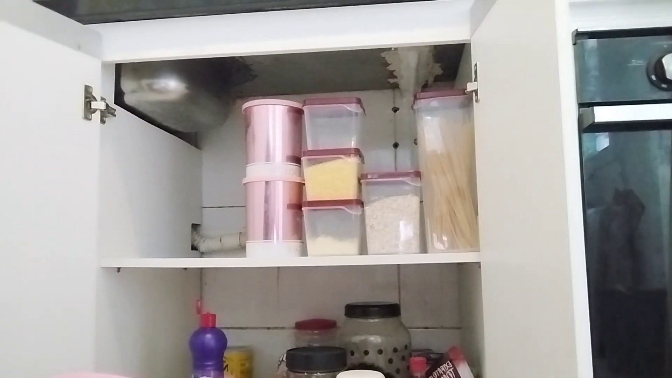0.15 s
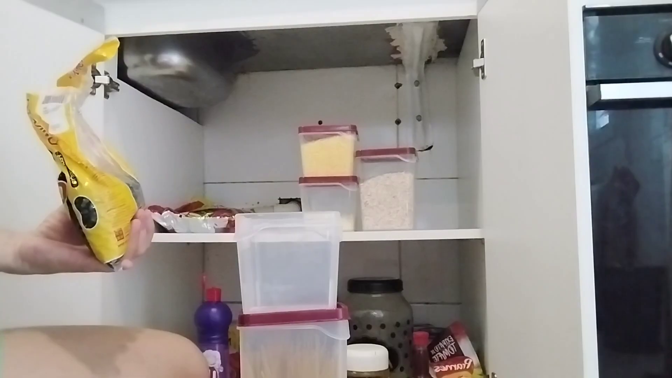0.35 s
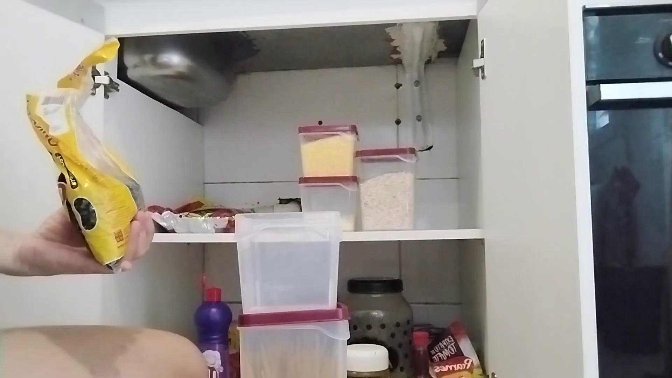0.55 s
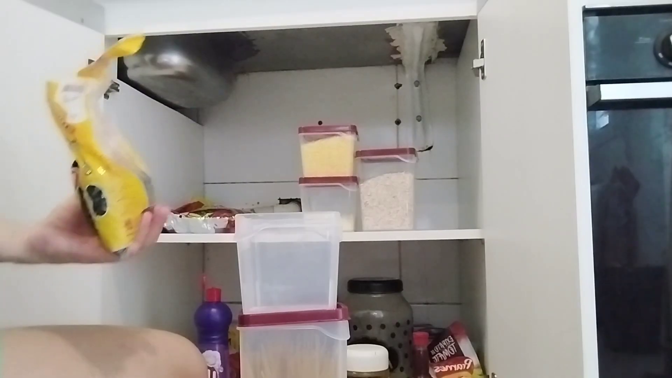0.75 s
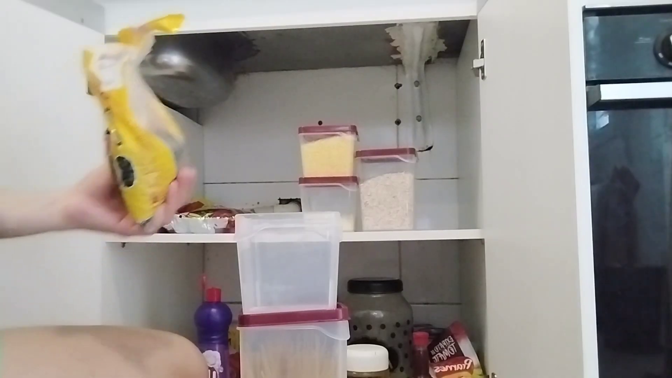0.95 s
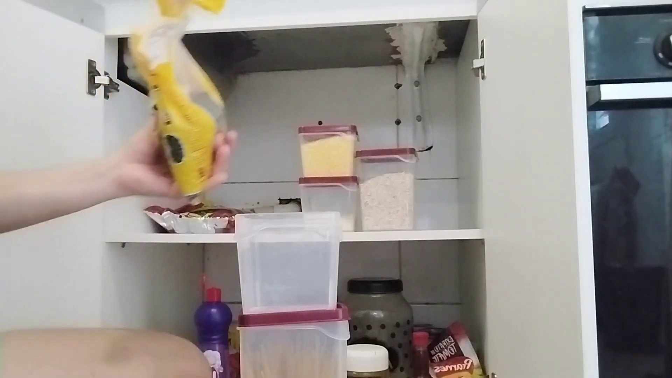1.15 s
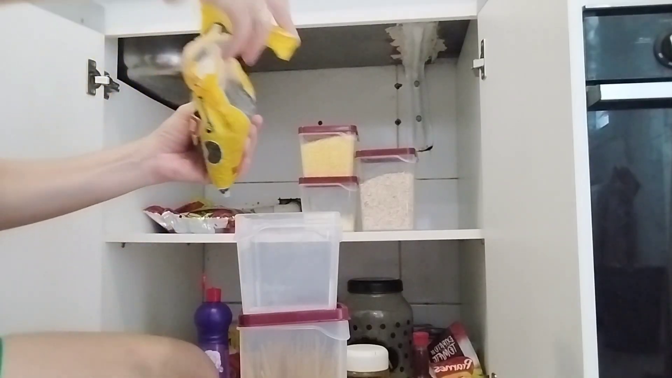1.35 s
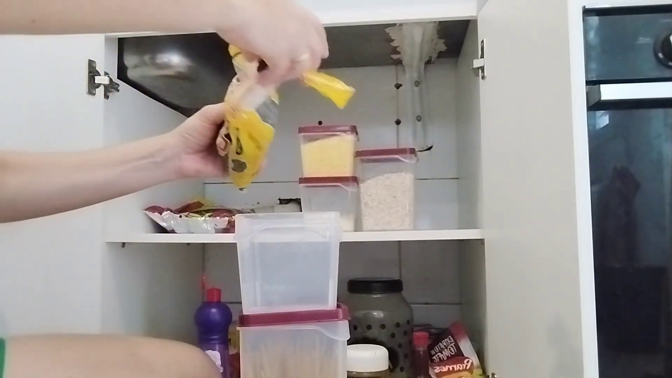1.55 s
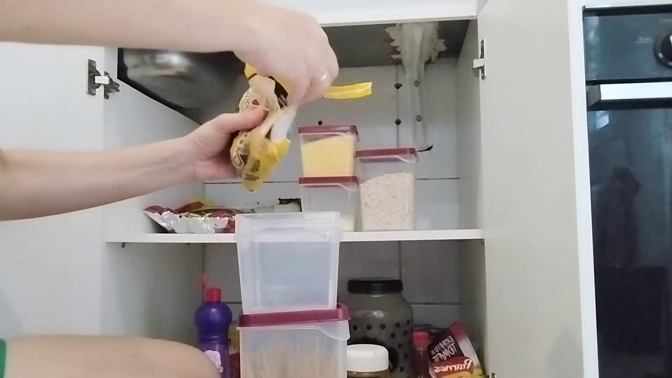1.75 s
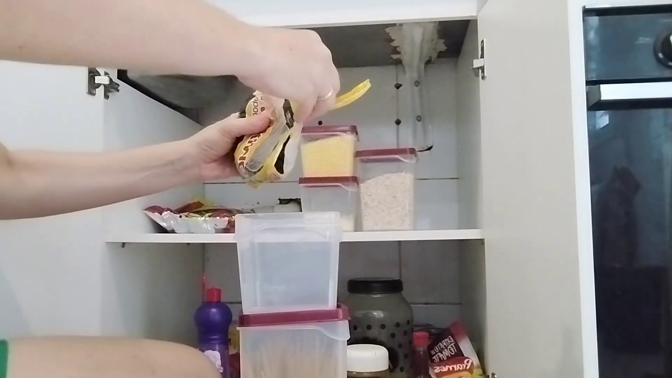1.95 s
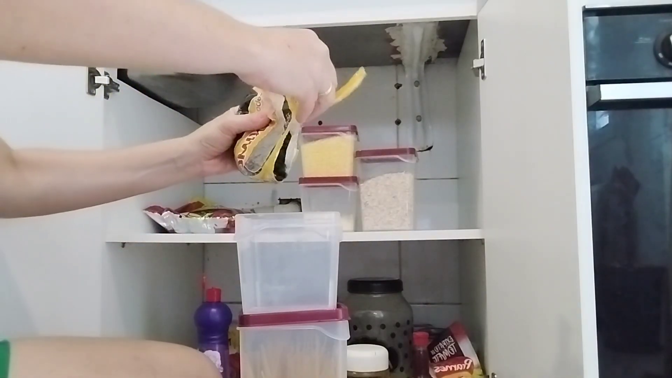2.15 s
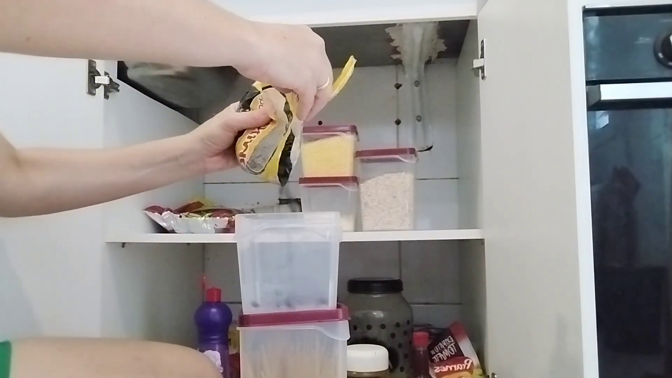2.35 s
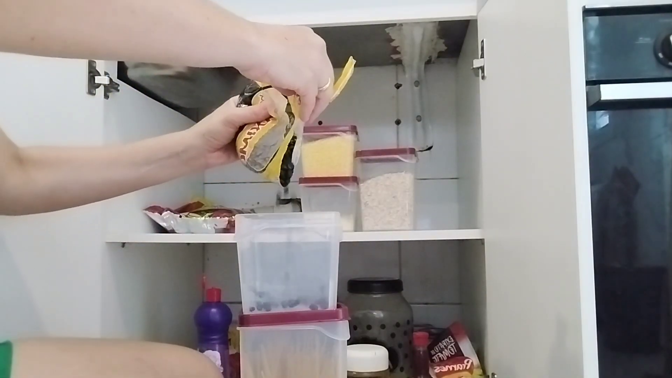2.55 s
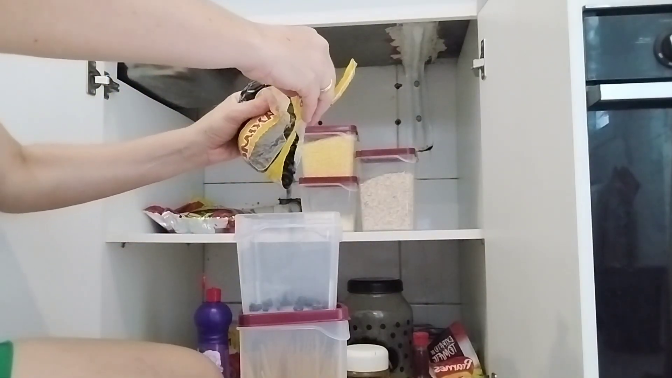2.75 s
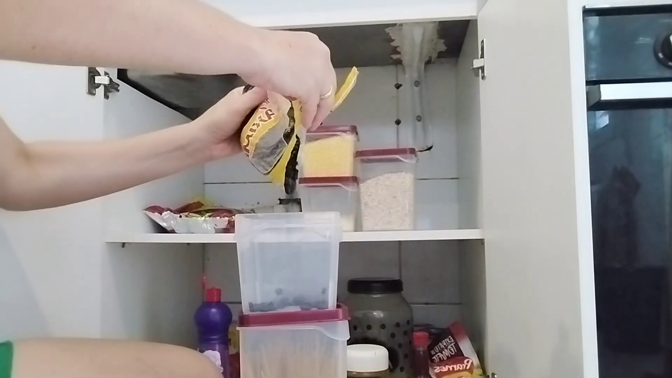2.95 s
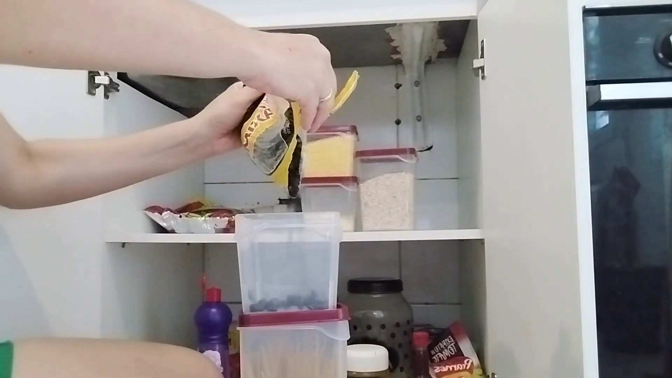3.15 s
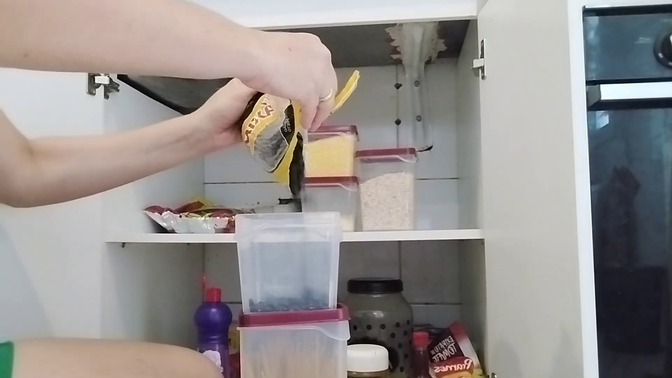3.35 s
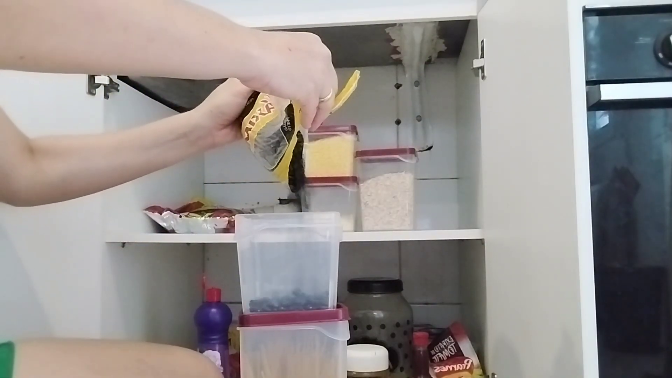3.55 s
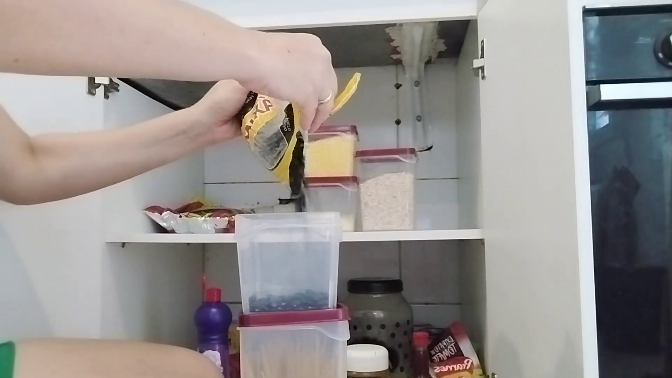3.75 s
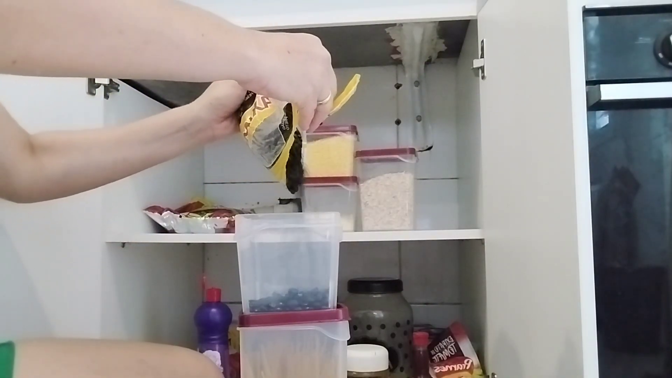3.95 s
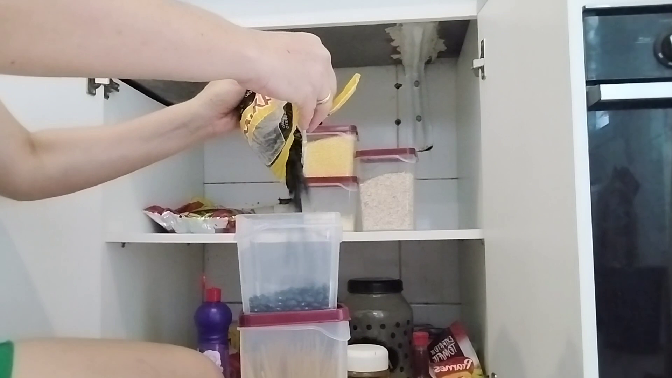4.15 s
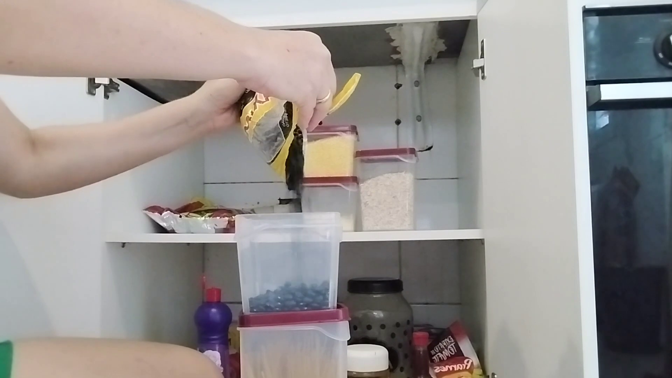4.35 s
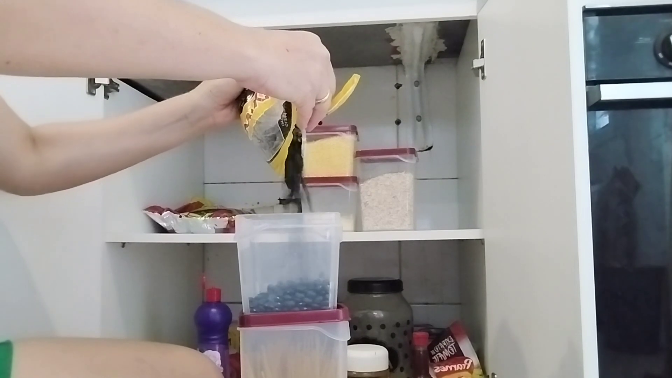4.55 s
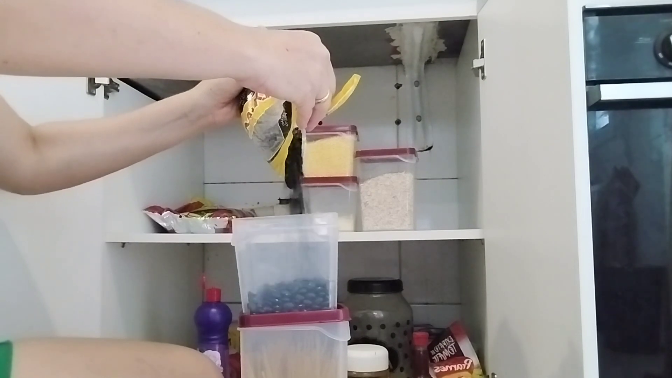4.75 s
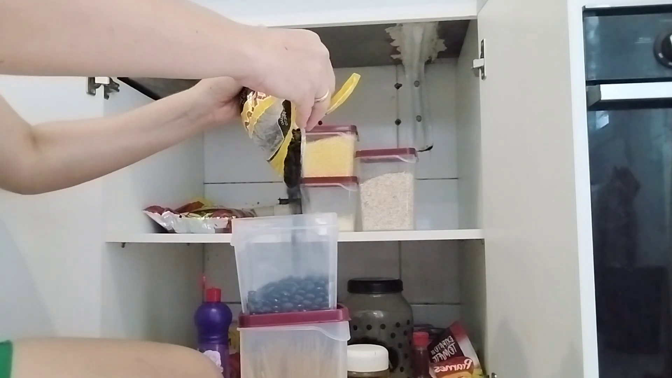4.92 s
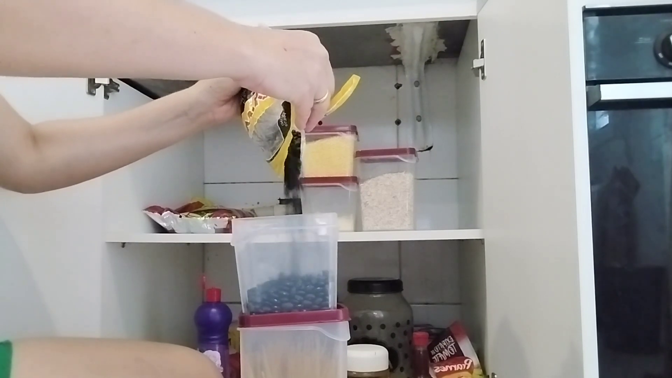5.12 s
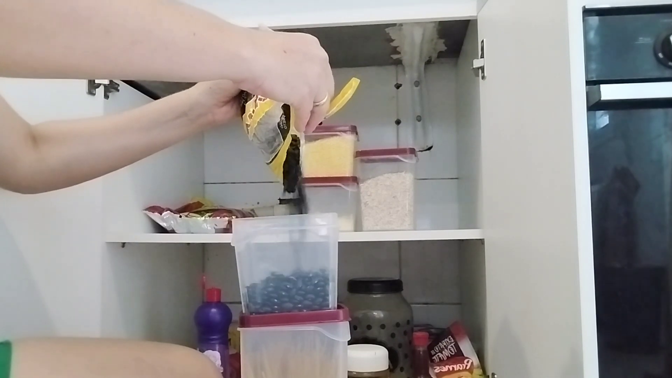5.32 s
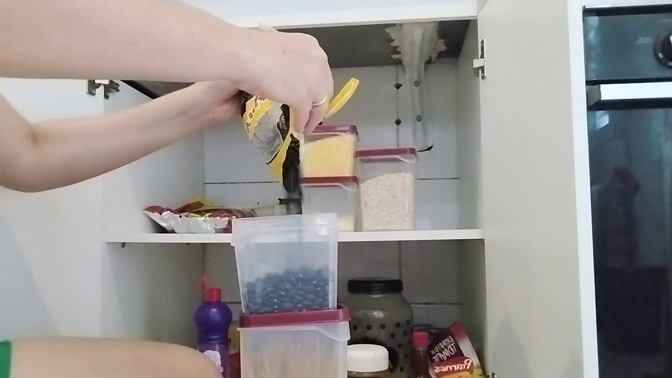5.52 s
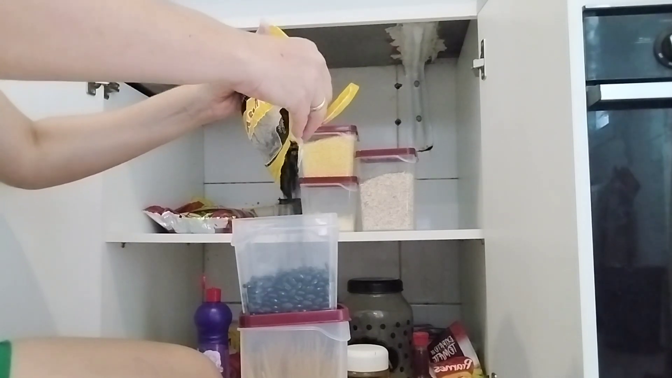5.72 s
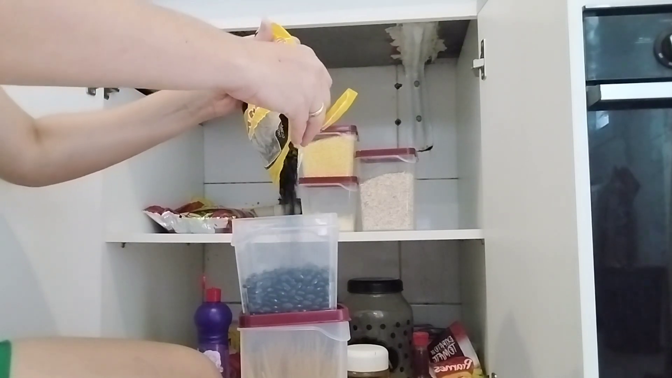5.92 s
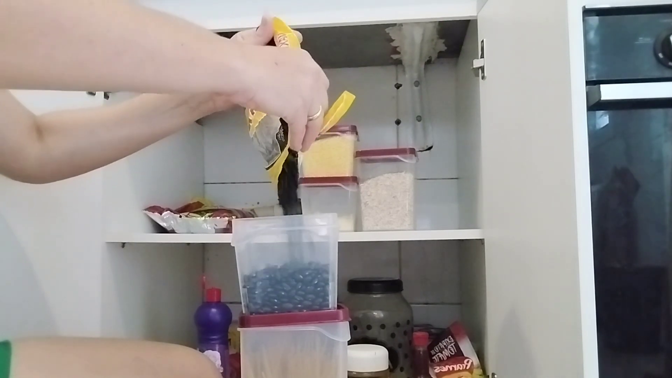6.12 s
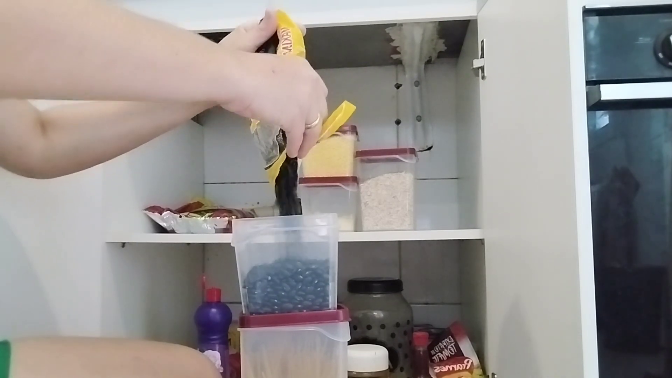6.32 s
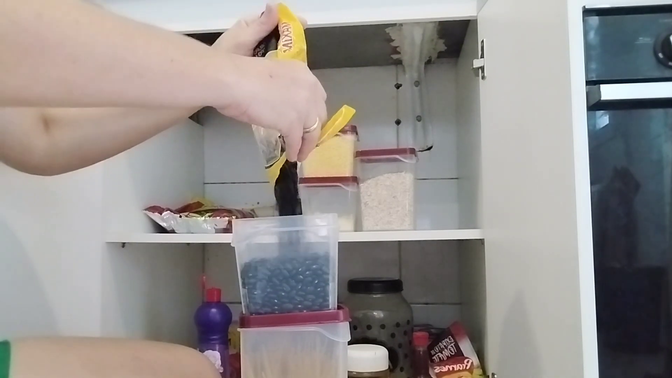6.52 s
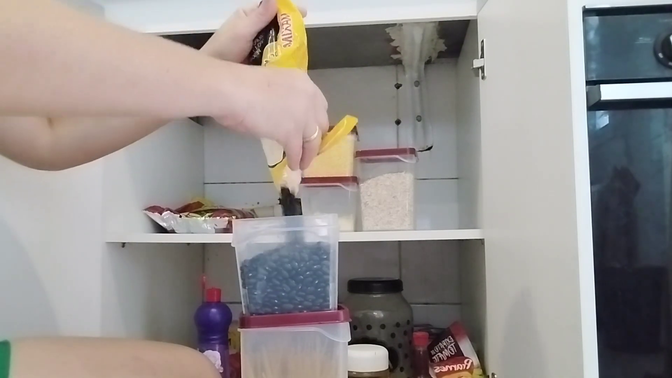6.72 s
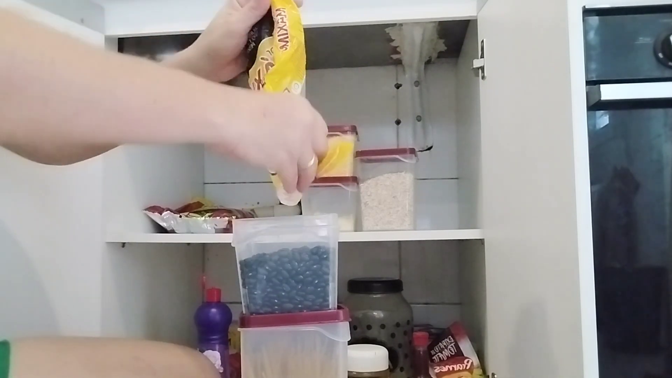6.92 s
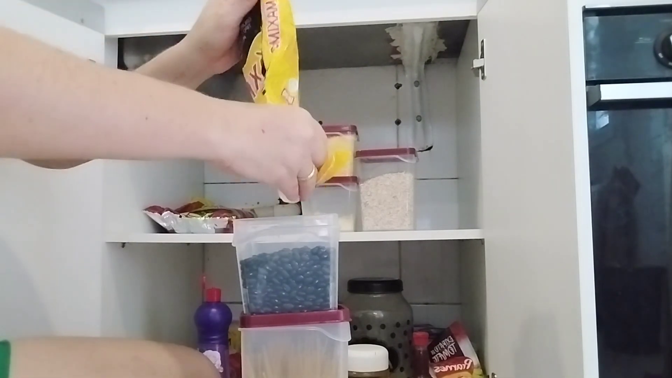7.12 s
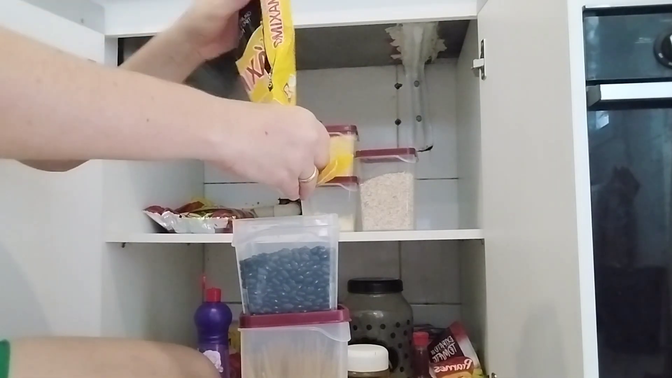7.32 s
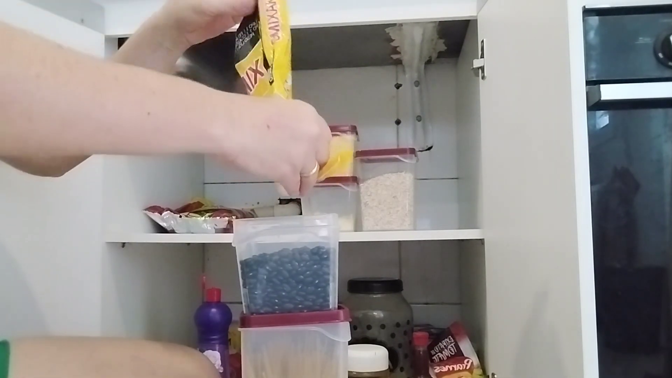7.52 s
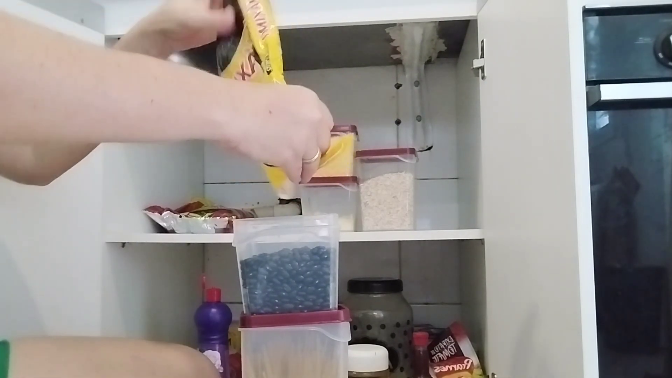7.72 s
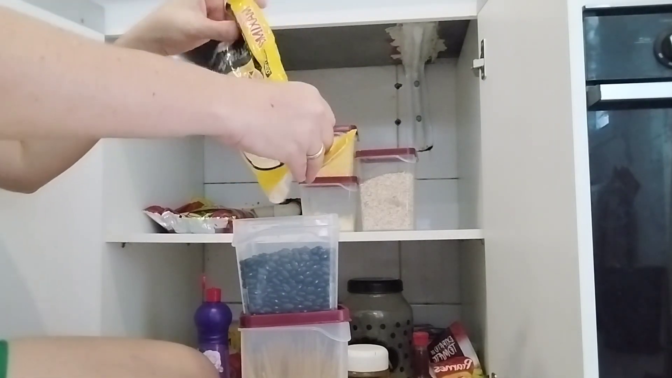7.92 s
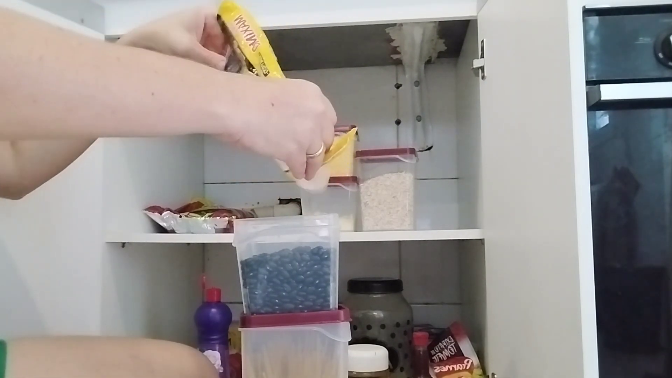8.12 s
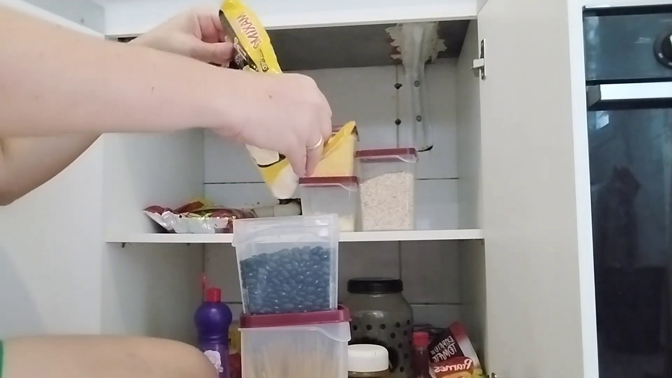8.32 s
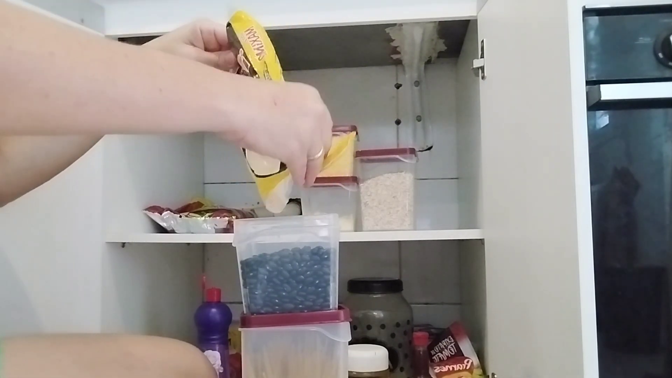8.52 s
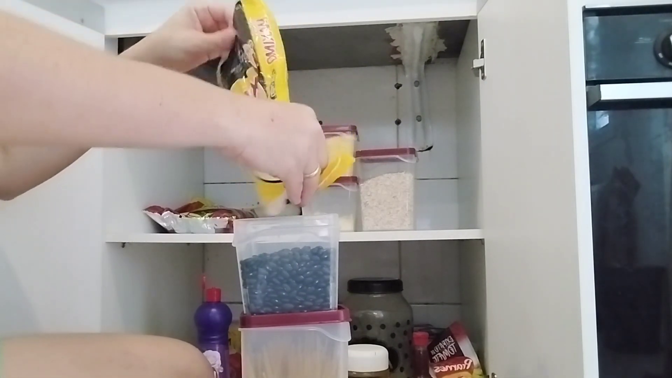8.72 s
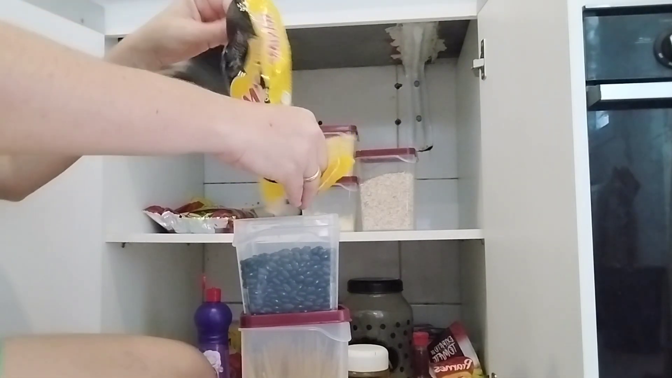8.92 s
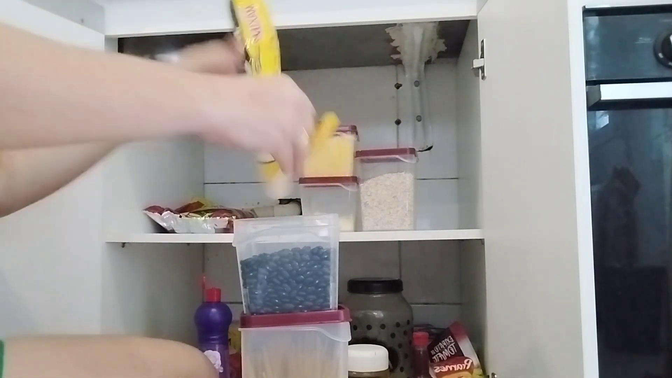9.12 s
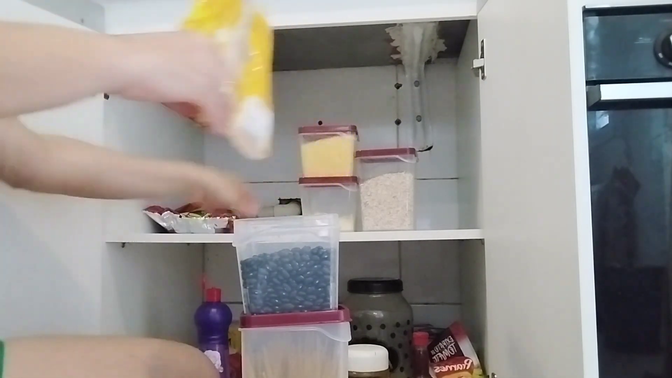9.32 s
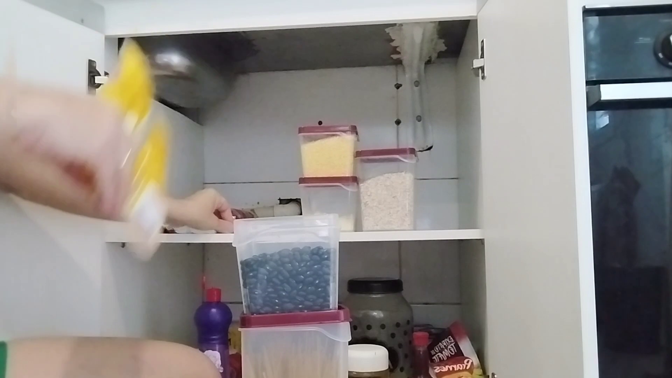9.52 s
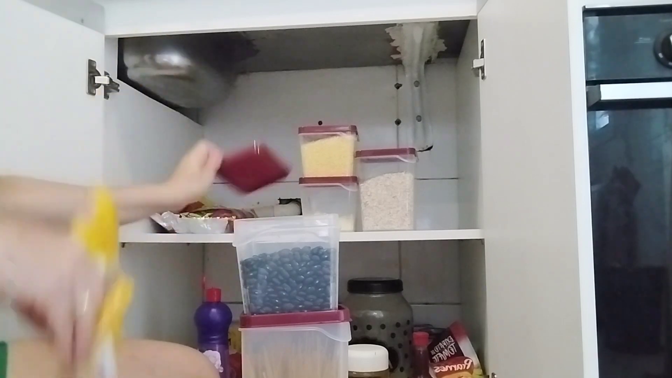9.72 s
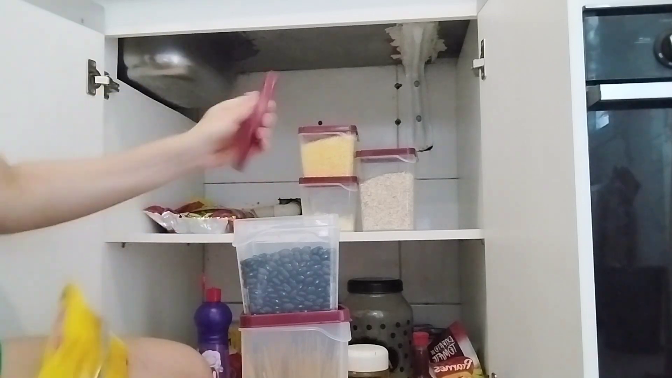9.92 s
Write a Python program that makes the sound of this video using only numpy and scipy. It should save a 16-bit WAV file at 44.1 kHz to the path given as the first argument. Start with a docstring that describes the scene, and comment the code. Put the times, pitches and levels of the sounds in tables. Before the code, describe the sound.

Dry beans pour from a crackling plastic packet into a plastic tub, rattling hollow at first, then duller as it fills.

```python
"""In a tiled room, in front of an open kitchen cupboard, dry beans pour from a plastic packet into a plastic tub.
Random and timed impacts ring the modes of the tub's bottom and walls, then of a growing heap of beans.
The packet rustles and crackles in the hands: fine impacts ring its film and load, and creases snap.
A small two-port microphone hears it up close, with cupboard echoes, the room's tail, one soft bump
on the cabinet and, in the background, a low household rumble of filtered noise and drones."""
import sys
import numpy as np
from scipy import signal
from scipy.fft import rfft, irfft, next_fast_len
from scipy.io import wavfile
from scipy.ndimage import uniform_filter1d

SR = 44100
rng = np.random.default_rng(int(sys.argv[2]) if len(sys.argv) > 2 else 0)


def unload_audio(sound):
    """Save the sound as a 16-bit wav file, at the path given as the first command line argument."""
    columns = np.transpose(np.atleast_2d(sound))
    # keep every value between -1 and 1, then stretch to whole-number steps
    steps = np.round(np.clip(columns, -1, 1) * 32767)
    wavfile.write(sys.argv[1], SR, steps.astype(np.int16))


N = 439677
T = np.arange(N) / SR

# the stream of beans: (time [s], clatter level [dB], sliding hiss against clatter [dB])
STREAM = [(2.18, -51, -2), (2.33, -52, -9), (2.36, -36, -13), (2.55, -31, -7.5), (2.9, -40, -5.5),
          (3.2, -30, -6), (3.6, -28, -10), (3.9, -30.5, -13), (4.5, -33.5, -12), (5.0, -38.5, -8.5),
          (5.9, -46, -4), (6.45, -41, -4), (6.68, -41.5, -4.5), (6.8, -43.5, -5), (6.93, -55.5, -5),
          (7.0, -72, -14)]
# stragglers that follow each bean or clump: level against its peak and against its thud
SHOWER_DB, SHOWER_THUD_DB, SHOWER_T60_S = -28, -17.5, 0.12
# the rising heap mutes the plastic from here on, for 2.5 s
BURIED_S, BURIED_DB_PER_S = 3.25, -4.5
# beans and clumps that stand out:
# (time [s], relative level [dB], thud in the tub against it [dB], click of the skin against it [dB])
LOUD_BEANS = [(2.185, -24, -12, -17), (2.192, -19.5, -20, -22), (2.213, -18, -25, -10.5),
              (2.26, -14.5, -24, -15), (2.293, -22, -12, -11), (2.328, -18, -10, -16),
              (2.352, -7, -7.5, -23), (2.407, -17, -3, -26), (2.428, -15, -12, -26), (2.46, -9.5, -10, -12),
              (2.508, -10, -9.5, -20), (2.549, -15, -10, -9), (2.569, -13, -19, -9),
              (2.589, -15.5, -2.5, -13), (2.617, -19, 2.5, -31), (2.647, -16.5, -2.5, -26),
              (2.678, -14.5, -4, -25), (2.724, -6, -11, -16), (2.752, -9, -4.5, -20),
              (2.812, -8.5, -12, -20), (2.826, -9, -6, -25), (2.849, -12.5, -4, -22),
              (2.877, -10.5, -7, -32), (2.896, -13.5, -5, -24), (2.911, -12, -5.5, -22),
              (2.946, -8, -13, -17), (2.964, -11, -12, -20), (2.992, -7, -5.5, -12.5),
              (3.02, -10, -10.5, -13), (3.05, -9.5, -9, -19), (3.06, -10.5, -2, -26),
              (3.098, -8, -10.5, -14.5), (3.151, -10.5, -14, -13), (3.165, -17, -11, -16),
              (3.186, -14, -3.5, -20), (3.205, -16.5, -5.5, -18), (3.231, -13, -18, -20),
              (3.246, -7.5, -11, -23), (3.266, -12, -4.5, -22), (3.29, -16, -6, -20),
              (3.308, -14.5, -7, -20), (3.319, -12.5, -2.5, -24), (3.345, -10.5, -13, -21),
              (3.379, -12, -13, -16), (3.432, -9, -9.5, -15), (3.47, -12, -1, -27), (3.507, -13.5, -7, -23),
              (3.535, -9.5, -10, -19), (3.562, -9, -9, -23), (3.59, -11, -3.5, -14),
              (3.621, -15, -1.5, -20), (3.689, -9.5, -6, -24), (3.708, -11.5, -11, -20),
              (3.727, -12, -3, -28), (3.769, -10.5, -6, -32), (3.809, -16, -5, -24), (3.832, -12, -8, -24),
              (3.862, -20, -10, -22), (3.879, -16.5, -5, -22), (3.903, -21, 4.5, -25), (3.99, -19, -2, -17),
              (4.01, -13, -10, -20), (4.054, -24, -3, -24), (4.105, -17.5, -2, -26), (4.134, -18, -11, -15),
              (4.169, -20, -10, -20), (4.198, -18.5, -2, -25), (4.445, -25, -19, -21),
              (4.463, -19, -12, -22), (4.532, -17, -12, -24), (4.622, -34, -14, -22), (4.687, -23, -6, -24),
              (4.779, -18, -10, -20), (4.858, -29, -7, -21), (4.99, -22.5, -15, -24), (5.044, -21, -7, -26),
              (5.074, -27, -11, -22), (5.095, -24, -4, -29), (5.214, -23, -9, -22), (5.353, -34, -10, -22),
              (5.434, -25, -17, -22), (5.532, -27.5, -5, -24), (5.562, -45, -8, -22), (5.616, -40, -6, -20),
              (5.682, -30, -8, -22), (5.731, -27.5, -3, -24), (5.809, -30, -5, -20), (5.902, -45, -3, -18),
              (5.973, -38, -6, -20), (6.036, -24, -12.5, -28), (6.114, -30, -4, -18),
              (6.136, -25, -1.5, -17), (6.18, -30, -4, -22), (6.19, -34, -4, -22), (6.231, -36, 4, -19),
              (6.245, -35, -6, -22), (6.3, -34, 2, -18), (6.324, -33, -1, -17), (6.407, -42, 4, -23),
              (6.423, -32, 1, -16), (6.455, -32, -8, -16), (6.479, -26.5, -4, -14), (6.504, -21, -4.5, -29),
              (6.586, -24, -5.5, -19), (6.617, -18.5, -12, -29), (6.633, -26, -6, -22),
              (6.646, -29, -9, -22), (6.756, -26, -13, -19), (6.772, -26.5, -8, -20),
              (6.829, -26.5, -12, -13)]


def pour():
    """Bean impacts shared out to the tub, the heap, the bean skins and the packet they slide from."""
    stream_db, slide_db = columns(STREAM)
    _, peak_db, thud_db, click_db = np.transpose(LOUD_BEANS)
    flow = undb(stream_db) + trail(pushes(LOUD_BEANS, peak_db + SHOWER_DB), SHOWER_T60_S)
    thud_shower = pushes(LOUD_BEANS, peak_db + thud_db + SHOWER_THUD_DB)
    heavy = undb(stream_db) + trail(thud_shower, SHOWER_T60_S)
    buried_db = BURIED_DB_PER_S * np.clip(T - BURIED_S, 0, 2.5)
    hits = patter(500, 1.5) * undb(-6.0)
    after = rng.random((len(LOUD_BEANS), 2))  # one set of lags for thud, tap and click
    thuds = clumps(peak_db + thud_db + 4.5, after)
    taps = clumps(peak_db - 0.5, after)
    clicks = clumps(peak_db + click_db + 10.5, after)
    out = tub(hits * flow, hits * heavy, thuds, taps, buried_db)
    out += heap(hits, flow, heavy, thuds, taps, buried_db)
    out += skins(flow, clicks, buried_db)
    out += sliding(flow, slide_db, clicks)
    return out + first_touch(taps, buried_db)


CLUMP_S, CLUMP_DB = .006, -3.5  # spread of the two followers' lags, their level against the first


def clumps(db, after):
    """Each timed bean pushes once, then two weaker ones land just behind it."""
    out = pushes(LOUD_BEANS, db)
    s = np.array(LOUD_BEANS)[:, 0]
    for lag in after.T:
        out[((s + .001 + CLUMP_S * lag) * SR).astype(int)] += undb(db + CLUMP_DB)
    return out


TUB_T60_S = 0.059  # at 800 Hz; higher modes die sooner
BOTTOM_BELOW_HZ, WALLS_BELOW_HZ = 650, 1000
BOTTOM_DB, WALLS_DB = -5, -4.5  # stream level against the clatter
COVERED_S, COVERED_DB_PER_S, COVERED_DB = 3.35, -19.5, -26  # the bottom is covered first, down to a floor
# modes of the plastic tub: (frequency [Hz], relative level [dB])
TUB_MODES = [(330, -9.5), (455, -15), (512, 6), (586, -0.5), (736, -7.5), (783, 1.5), (836, 2),
             (905, -12.5), (1033, -19.5), (1195, -17), (1510, -14), (1725, -7.5), (1795, -15), (1905, -5.5),
             (2010, -3.5), (2115, -6), (2300, -8), (2700, -9), (2880, -9.5), (3100, -5), (3270, -5.5),
             (3530, -7.5), (4120, -23), (4930, -8)]


def tub(fall, drop, thuds, taps, buried_db):
    """Impacts ring the plastic's damped modes, which the heap mutes, the bottom most."""
    width = np.log(1000) / np.pi / TUB_T60_S
    modes = np.array([(hz, width * (hz / 800) ** 1.17, db) for hz, db in TUB_MODES])
    part = np.digitize(modes[:, 0], [BOTTOM_BELOW_HZ, WALLS_BELOW_HZ])
    bare = undb(buried_db)
    covered = undb(np.clip(COVERED_DB_PER_S * (T - COVERED_S), COVERED_DB, 0))
    drum = body(covered * bare * (drop * undb(BOTTOM_DB) + thuds), modes[part == 0], 2.2)
    # the heap leans on the walls
    drum += body(bare ** 1.23 * (drop * undb(WALLS_DB) + thuds), modes[part == 1], 1.7)
    drum += body(bare * (fall * undb(-0.5) + taps), modes[part == 2], 0.99)
    return drum


# first hard touch of a bean on plastic: (frequency [Hz], width [Hz], relative level [dB])
TOUCH_MODES = [(1290, 2700, -3.5), (2900, 1400, -10)]


def first_touch(taps, buried_db):
    """A hard touch rings briefly in broad modes and weakens as the plastic is buried."""
    return body(taps * undb(buried_db) ** 1.2 * undb(2.5), TOUCH_MODES, 1.2)


# as the air above the heap shortens, its clack leans to the higher resonance, for 2.5 s
FILL_S, FILL_DB_PER_S = 2.3, 1.5
# resonances of the heap: (frequency [Hz], width [Hz], relative level [dB])
HEAP_MODES = [(374, 482, -2), (831, 165, 0.5), (1040, 220, -5), (1960, 210, -7.5), (2470, 750, -4.5),
              (3200, 760, -9.5)]


def heap(hits, flow, heavy, thuds, taps, buried_db):
    """Beans clack on beans in broad, heavily damped modes that gain as the plastic loses."""
    heaped = undb(-9.5 - 0.63 * buried_db)
    fill = undb(FILL_DB_PER_S * np.clip(T - FILL_S, 0, 2.5))
    hits = hits * undb(-9.5) + patter(1400, 2.13) * undb(-4.5)
    low = heaped * (hits * heavy + thuds * undb(7.0))
    clack = body(low, HEAP_MODES[:1], 4.0)
    clack += body(low / fill, HEAP_MODES[1:2], 4.1)
    clack += body(low * fill, HEAP_MODES[2:3], 1.6)
    clack += body(heaped * (hits * flow + taps * undb(7.5)), HEAP_MODES[3:], 2.0)
    return clack


# click of a hard bean skin: (frequency [Hz], width [Hz], relative level [dB])
SKIN_MODES = [(4440, 2300, 4), (7040, 1200, -1)]


def skins(flow, clicks, buried_db):
    """Hard skins click in short, broad high modes; the stream's clicks soften as the heap rises."""
    stream = patter(1200, 2.2) * flow * undb(-13.0 + 0.5 * buried_db)
    return body(stream, SKIN_MODES, 3.3) + body(clicks, SKIN_MODES, 1.5)


# thin packet film, also rustled by the hands: (frequency [Hz], width [Hz], relative level [dB])
FILM_MODES = [(2600, 3000, -3.5), (5600, 3200, -4), (9800, 2500, -7.5), (14000, 9500, 2.5)]


def sliding(flow, slide_db, clicks):
    """Beans hiss out of the packet as dense tiny impacts in the film's highest modes."""
    scrape = patter(2500, 2.1) * flow * undb(slide_db - 2.0)
    return body(scrape + clicks, FILM_MODES[2:], 2.85)


def packet():
    """Handled film and its load of beans, panned between the ports along the creases."""
    s, _, _, _, _, pan_db = np.transpose(CREASES)
    pan = np.interp(T, s, pan_db) / 2
    return (rustle() + snaps()) * undb(np.array([pan, -pan]))


EDGE_DB = -20  # how far a squeeze has sunk after its swell or fade time
# settling after each snap, against the snap: (film [dB], beans [dB], load [dB])
SETTLE_LEVELS = (-26, -22, -15.5)
SETTLE_T60_S = 0.14
# hands squeezing the packet: (loudest at [s], swell [s], fade [s], film rustle level [dB],
# beans shifting against rustle [dB], slump of the load against rustle [dB])
GRIPS = [(.11, 0.029, 0.09, -62.5, -1, -4), (.18, 0.11, .04, -78, -4, 0), (.8, 0.24, 0.13, -74, -10, 12),
         (1.07, 0.11, 0.028, -68, -2, 13), (1.35, 0.09, 0.11, -99, 3, 5), (1.62, 0.073, 1, -59.5, -8, 1.5),
         (1.96, 1, 0.94, -46, -18, -4), (7.04, 0.078, 0.047, -59, 13, 11),
         (7.23, 0.026, 0.048, -50.5, 4.5, 0), (7.6, 0.73, .3, -57, -1.5, 2.5),
         (7.88, 0.11, 0.13, -51.5, 1, 4.5), (8.13, 0.023, 0.12, -55, 9, -1),
         (8.4, 0.16, 0.066, -54.5, -1, 2), (8.71, 0.18, 0.072, -55, -2, -1), (8.89, 0.13, 0.12, -58, 10, 5),
         (9.13, 0.059, 0.087, -49, -2, -8), (9.43, .05, 0.19, -79, 9, 15),
         (9.55, 0.1, 0.074, -74.5, 16.5, 19), (9.62, 0.076, 0.068, -73.5, 21, 21.5),
         (9.82, .06, 0.11, -71, 6.5, 7), (9.97, 0.045, .1, -65, 5, 6)]
# beans held in the packet: (frequency [Hz], width [Hz], relative level [dB])
LOAD_MODES = [(355, 133, -0.5), (550, 120, -1), (740, 54, -9.5), (1115, 400, -4), (2150, 1100, -0.5),
              (3470, 2400, -14.5)]


def rustle():
    """Each squeeze swells and fades fine impacts in the film, the shifting beans and the slumping load."""
    _, peak_db, _, knock_db, _, _ = np.transpose(CREASES)
    settling = zip((peak_db, peak_db, peak_db + knock_db), SETTLE_LEVELS)
    film, shift, slump = (trail(pushes(CREASES, db + settle_db), SETTLE_T60_S) for db, settle_db in settling)
    for at, swell_s, fade_s, db, shift_db, slump_db in GRIPS:
        edge = np.where(T < at, (at - T) / swell_s, (T - at) / fade_s)
        grip = undb(db + EDGE_DB * edge)
        film = film + grip
        shift = shift + grip * undb(shift_db)
        slump = slump + grip * undb(slump_db)
    out = body(patter(1800, 3.3) * film * undb(-10.5), FILM_MODES, 2.0)
    out += body(patter(900, 2.7) * shift * undb(-8.0), LOAD_MODES[3:], 3.2)
    out += body(patter(500, 1.8) * slump * undb(-7.0), LOAD_MODES[:3], 1.7)
    return out


# creases snapping and the load slumping: (time [s], relative level [dB], pitch of the crease [Hz],
# body knock against it [dB], top snap against it [dB], left minus right [dB])
CREASES = [(0.094, -58, 4640, -7, -11, -20), (0.714, -47, 4440, -8, -10, -2),
           (0.734, -54, 3530, -8, -2, -1), (0.794, -42.5, 5630, -20, -25, -4),
           (0.805, -49, 5000, -14, -21, 1), (0.8702, -43.5, 4300, -2, -22, 1),
           (1.0566, -46.5, 5630, 1, -10, -1), (1.168, -46, 3510, 5, -23, -1),
           (1.2934, -42.5, 3400, -1, -17, 0), (1.364, -62, 2500, 12, -25, -1),
           (7.013, -35.5, 2990, -5, -18, -2), (7.0426, -41.5, 2890, -2, -13, 1),
           (7.0644, -55, 2820, -9, 5, -2), (7.215, -41, 2690, -14, -16, -5),
           (7.312, -38.5, 3000, 0.5, -37, 0), (7.3952, -41, 2970, -4, -20, -1),
           (7.474, -34, 2620, -20, -2.5, -2), (7.589, -39, 2760, -19, -17, -1),
           (7.646, -38.5, 5350, -21, -25, -1), (7.8255, -42, 3940, 9, -18, 1.0),
           (7.8637, -34.5, 2800, 4, -29, -1), (7.947, -46, 2750, -17, -24, 0), (8.08, -43, 2550, 6, -21, 2),
           (8.093, -44.5, 2450, 13.5, -23, -2), (8.224, -24.5, 3400, 5.5, -25, -6),
           (8.2261, -24.5, 2900, 7.5, -22, 0), (8.238, -45, 2900, -1.5, -24, 4),
           (8.3531, -46, 2930, 14.5, -21, -3), (8.4908, -46, 3050, -27, -20, -0.5),
           (8.604, -48, 2670, -32, -37, -2), (8.6925, -44, 2600, -25, -3.5, -1),
           (8.798, -49, 2820, -12, -16, -5), (8.8574, -41, 5480, -13, -12, -3),
           (8.878, -34, 4300, -8, -16, 0), (8.97, -48, 3030, 11, -28, 0),
           (9.1103, -44, 3040, -12.5, -4, -3), (9.234, -47.5, 4700, -17, -36, -4),
           (9.465, -51, 2400, 0, -24, 0), (9.544, -56, 2600, 10, -25, 1), (9.604, -50, 2500, 1, -26, 0),
           (9.62, -59, 2700, 5, -23, 0), (9.8077, -50.5, 2560, -17.5, -25.5, 1.5),
           (9.8453, -58.5, 3790, -3, -17, 2)]


def snaps():
    """Creases give way in quick runs of slips at their own pitch and knock the load and film."""
    s, peak_db, crease_hz, knock_db, top_db, _ = np.transpose(CREASES)
    snap = body(pushes(CREASES, peak_db + knock_db + 7.0), LOAD_MODES[:3], 1.5)
    snap += body(pushes(CREASES, peak_db + knock_db + 13.0), LOAD_MODES[3:4], 0.78)
    snap += body(pushes(CREASES, peak_db + top_db + 23.0), FILM_MODES[2:], 1.2)
    snap += body(pushes(CREASES, peak_db + knock_db - 15.0), LOAD_MODES[4:], 1.5)
    give = np.exp(-np.arange(600) / SR / 0.0011)
    for start, db, hz in zip((s * SR).astype(int), peak_db, crease_hz):
        slips = 0.33 * give * rng.standard_normal(len(give))
        slips[0] = 1  # the first slip is the sharpest
        snap[start:start + len(give)] -= undb(db + 9.5) * ring(slips, hz, 0.72 * hz)
    return snap


BUMP_S, BUMP_DB, BUMP_PUSH_S = 4.722, -45, 0.025
# a soft bump on the cabinet: (frequency [Hz], width [Hz], relative level [dB])
BUMP_MODES = [(110.65, 40, -18.5), (190, 38.3, 4.5), (257, 98, 2.5), (480, 170, -10)]


def cabinet_bump():
    """A soft bell-shaped burst of noise, each sample of random sign, wakes the cabinet's low modes."""
    push = undb(BUMP_DB) * np.exp(-((T - BUMP_S) / BUMP_PUSH_S) ** 2) * (abs(T - BUMP_S) < .1)
    return body(push * rng.choice([-1, 1], N), BUMP_MODES, 1.0)


SPOTS, SPOT_HOLD_S = 3, .03  # spots the close sounds come from, time between new random shares
SPOT_LAG_S = .00009  # the outer spots reach one port this much sooner


def from_spots(close):
    """The close sound keeps shifting its share between spots, each with its own path to the ports."""
    hold = int(SPOT_HOLD_S * SR)
    share = np.repeat(rng.random((SPOTS, N // hold + 1)) ** 6, hold, axis=1)
    share = uniform_filter1d(share, hold // 4, axis=1)[:, :N]
    share /= np.sqrt(np.sum(share ** 2, axis=0))
    lags = SPOT_LAG_S * np.linspace(-1, 1, SPOTS)
    return sum(signal.oaconvolve(close * s, room(lag), axes=1)[:, :N] for s, lag in zip(share, lags))


ROOM_DB, CUPBOARD_DB = -1.5, -7  # energy against the direct sound
CUPBOARD_S, CUPBOARD_ALIKE = 0.0029, .25  # echo decay, share of energy common to both ports
ROOM_ALIKE_HZ = 220  # long waves reach both ports alike
# the room's tail: (frequency [Hz], reverberation time T60 [s])
TAIL_T60 = [(300, 0.46), (1500, 0.5), (5000, 0.53), (12000, 0.21)]
# phase by which the left port leads: (frequency [Hz], lead [rad])
PORT_LEADS = [(0, 0), (300, .3), (520, 1.2), (800, 1.3), (1400, .7), (2150, 1.2), (3000, 1.2), (16000, 9)]


def room(lag_s):
    """Direct sound, quick cupboard echoes and a diffuse decaying tail from one spot to each port."""
    size = 1 << 14
    t, f = np.arange(size) / SR, np.arange(size // 2 + 1) * SR / size
    tail = 0
    for hz, t60 in TAIL_T60:
        noise = ring(rng.standard_normal((3, size)), hz, 1.8 * hz)
        pair = two_ports(noise, np.clip(ROOM_ALIKE_HZ / hz, 0, 1))
        tail = tail + unit(pair) * np.sqrt(hz) * 1000. ** (-t / t60)
    tail *= np.clip(t / 0.0065, 0, 1)
    echoes = rng.standard_normal((3, size)) * np.exp(-t / CUPBOARD_S) * (t > .0015)
    near = two_ports(echoes, CUPBOARD_ALIKE)
    out = (undb(ROOM_DB) * unit(tail) + undb(CUPBOARD_DB) * unit(near)) / np.sqrt(size)
    out[:, 24] += 1  # direct sound, late enough to leave space for a lead
    lead = np.interp(f, *np.transpose(PORT_LEADS)) + 2 * np.pi * f * lag_s
    return irfft(rfft(out) * np.exp(1j * np.outer([.5, -.5], lead)))


def two_ports(noise, alike):
    """Mix a common and two separate noises so that the ports share part of their energy."""
    mid, left, right = noise
    return np.sqrt(alike) * mid + np.sqrt(1 - alike) * np.array([left, right])


# balance of the two ports: (frequency [Hz], left minus right [dB])
PORT_BALANCE = [(60, 1), (110, -1), (200, 2), (380, 3), (700, -2), (1290, 0.5), (2380, 1.5), (4400, -1),
                (8120, -2), (15000, 8)]
# close sources as the microphone hears them: (frequency [Hz], gain [dB])
MIC_COLOUR = [(120, -1), (230, -5), (330, -1), (3700, 0.5), (6000, -0.5), (8200, -8.5), (9400, -4),
              (10900, -11.5), (12500, -2.5), (16000, -3)]


def microphone(heard):
    """The ports differ in colour by frequency and share one response."""
    ports = [shaped(x, [(hz + 1, side * db / 2) for hz, db in PORT_BALANCE])
             for x, side in zip(heard, (1, -1))]
    return shaped(np.array(ports), MIC_COLOUR)


HOUSE_DB = -54.5  # rms of the common part of the hush
# household rumble: (frequency [Hz], relative level per Hz [dB])
HOUSE_COLOUR = [(12, -36), (20, 7), (38, -19), (123, -13), (234, -17.5), (377, -19.5), (513, -23),
                (698, -30), (3250, -47), (4180, -47.5), (7950, -58.5), (16000, -59)]
# the room's own low modes, ringing with the rumble: (frequency [Hz], width [Hz], level [dB])
LOW_MODES = [(59, 5, -68), (120, 10, -68.5), (174, 6, -69), (256, 6, -78.5), (301.5, 6.4, -68.5),
             (519, 14, -70.5)]
# the lower and the higher drone: (lower [Hz], higher [Hz])
DRONE_PITCHES = (94.7, 214.5)
# their bandwidths: (lower [Hz], higher [Hz])
DRONE_WIDTHS = (9.8, 3.8)
# the drones swell and fade: (time [s], level of the lower [dB], level of the higher [dB])
DRONE_LEVELS = [(0, -74, -66), (.3, -63, -72), (1.1, -68, -72), (2.2, -64, -61), (3.4, -56.5, -57),
                (3.7, -66, -59.5), (4.8, -60.5, -59), (4.95, -65, -70), (5.45, -67, -67), (5.92, -54, -70),
                (6.08, -64, -68), (6.25, -55, -69), (6.4, -62, -69), (7.45, -64, -68), (7.65, -55.5, -64.5),
                (8.0, -63, -64), (8.6, -67, -73), (9.3, -62.5, -69.5), (9.42, -51, -64), (9.6, -69, -69),
                (9.77, -54.5, -69), (9.9, -67, -67), (9.97, -57, -65)]


def house():
    """Steady coloured noise of the flat, plus low modes and drones that reach both ports alike."""
    mid, side = shaped(rng.standard_normal((2, N)), HOUSE_COLOUR)
    side = shaped(side, [(20, -4.0), (60, -4.5), (300, -7.5), (1000, 2.5), (16000, 3.0)])
    hush = undb(HOUSE_DB) * (mid + np.array([side, -side])) / np.sqrt(np.mean(mid ** 2))
    hum = sum(tone(hz, width_hz) * undb(db) for hz, width_hz, db in LOW_MODES)
    drones = zip(DRONE_PITCHES, DRONE_WIDTHS, columns(DRONE_LEVELS))
    hum += sum(tone(hz, width_hz) * undb(db) for hz, width_hz, db in drones)
    return hush + hum


def tone(hz, width_hz):
    """A wavering tone: noise ringing one narrow mode, rms 1."""
    return unit(ring(rng.standard_normal(N), hz, width_hz))


def undb(db):
    """Gain from dB."""
    return 10 ** (np.asarray(db) / 20)


def unit(x):
    """Scale to rms 1."""
    return x / np.sqrt(np.mean(x ** 2))


def columns(table):
    """Curve columns at every sample; the first is silent outside the table."""
    s, first, *rest = np.transpose(table)
    return [np.interp(T, s, first, -120, -120)] + [np.interp(T, s, c) for c in rest]


def ring(x, hz, width_hz):
    """One damped mode whose answer to a unit blow has about energy 1."""
    r = np.exp(-np.pi * width_hz / SR)
    poles = [1, -2 * r * np.cos(2 * np.pi * hz / SR), r * r]
    gain = np.sqrt((1 - r * r) / 2)
    return signal.lfilter([gain, 0, -gain], poles, x)


REACH_S = .0003  # longest time a blow takes to spread through a body


def body(blows, modes, spread_db):
    """Every blow strikes somewhere else, so it wakes each mode with its own strength and short lag."""
    hit = np.flatnonzero(blows[:-100])  # the lags must stay inside the sound
    out = 0
    for hz, width_hz, db in modes:
        push = np.zeros(N)
        lag = (rng.random(len(hit)) * REACH_S * SR).astype(int)
        push[hit + lag] = -blows[hit] * undb(db + spread_db * rng.standard_normal(len(hit)))
        out = out + ring(push, hz, width_hz)
    return out


def patter(per_s, scatter_db):
    """Random impacts, many small and few large, rms 1."""
    size_db = scatter_db * np.minimum(rng.exponential(size=N), 3.5)
    return unit((rng.random(N) < per_s / SR) * undb(size_db))


def pushes(table, db):
    """Timed impacts as single-sample pushes."""
    out = np.zeros(N)
    out[(np.array(table)[:, 0] * SR).astype(int)] = undb(db)
    return out


def trail(x, t60):
    """Every push leaves a level that dies away."""
    return signal.lfilter([1], [1, -1000. ** (-1 / (t60 * SR))], x)


def shaped(x, points):
    """Colour by (frequency [Hz], gain [dB]) points, joined on a log frequency axis."""
    hz, db = np.transpose(points)
    size = next_fast_len(N)
    f = np.arange(size // 2 + 1) * SR / size + 1  # 1 Hz up keeps the log finite
    return irfft(rfft(x, size) * undb(np.interp(np.log(f), np.log(hz), db)), size)[..., :N]


SMALL_HZ = 290  # tub and packet are too small to radiate well below this


def scene():
    """Close sources from changing spots, in the room at the microphone, over the house."""
    radiated = signal.butter(2, SMALL_HZ, "high", fs=SR, output="sos")
    close = signal.sosfilt(radiated, pour() + packet())
    close = close + cabinet_bump()
    return microphone(from_spots(close)) + house()


TOP_HZ = 15900


def record(dry):
    """The recorder cuts the top steeply with an elliptic low-pass."""
    return signal.sosfilt(signal.ellip(10, .2, 60, TOP_HZ, fs=SR, output="sos"), dry)


dry = scene()
out = record(dry)
unload_audio(out)
```